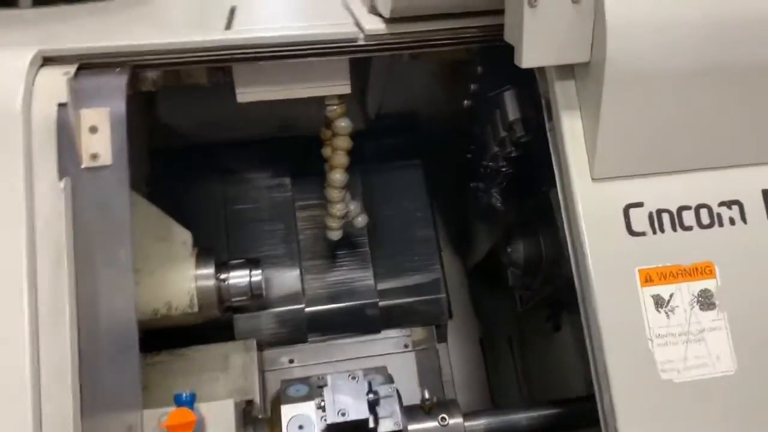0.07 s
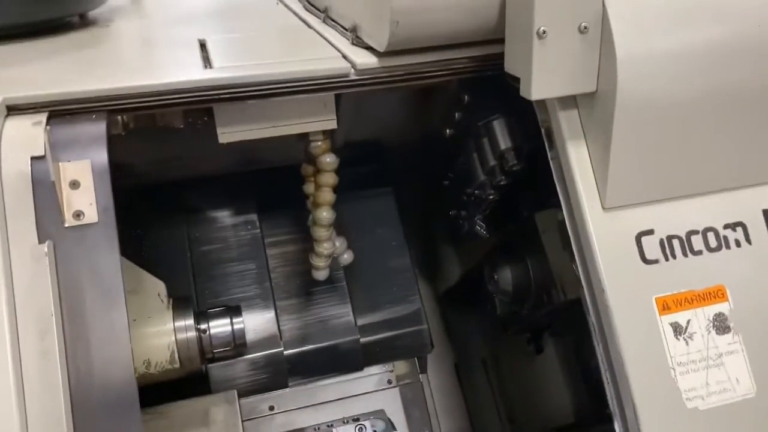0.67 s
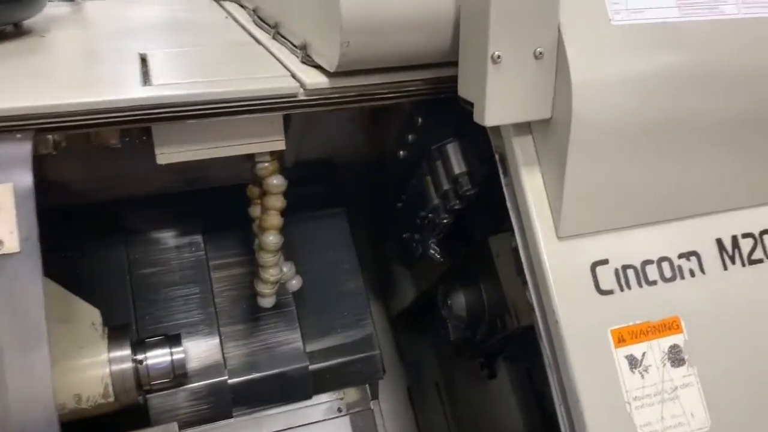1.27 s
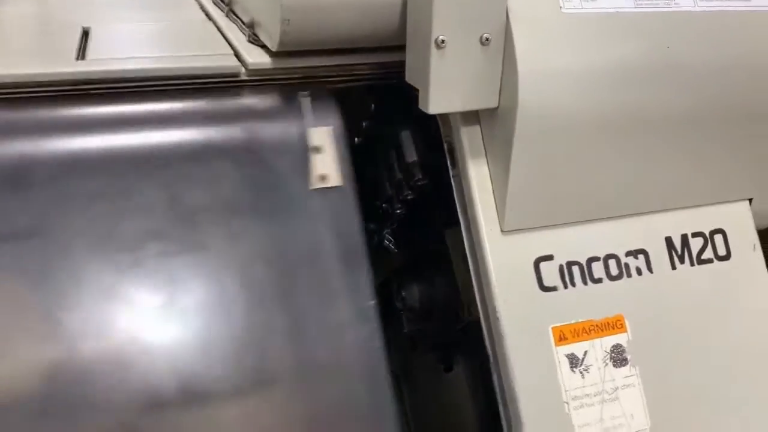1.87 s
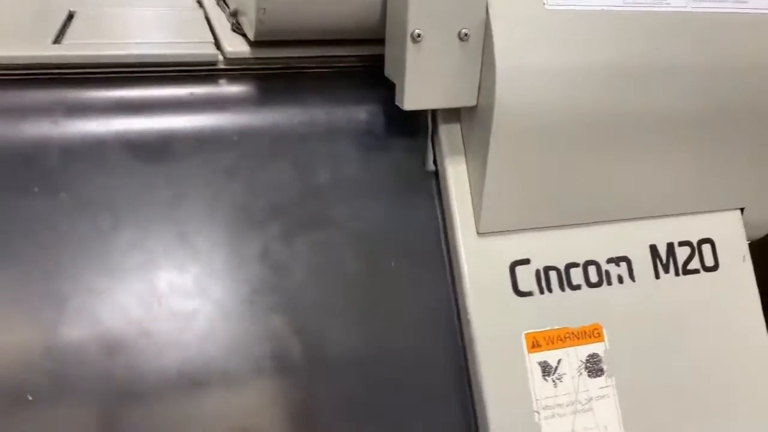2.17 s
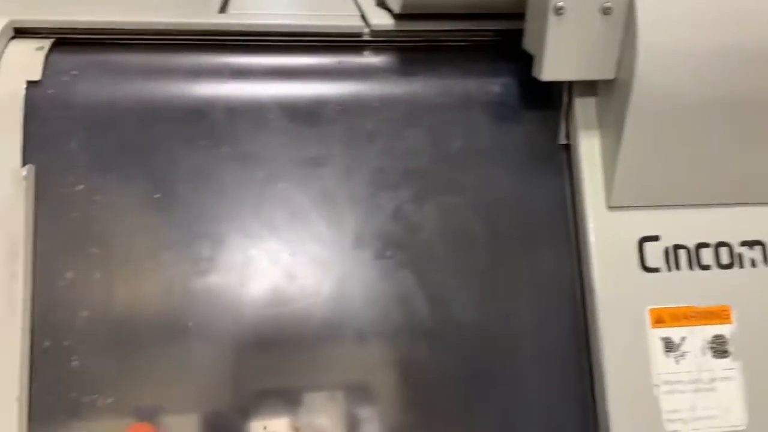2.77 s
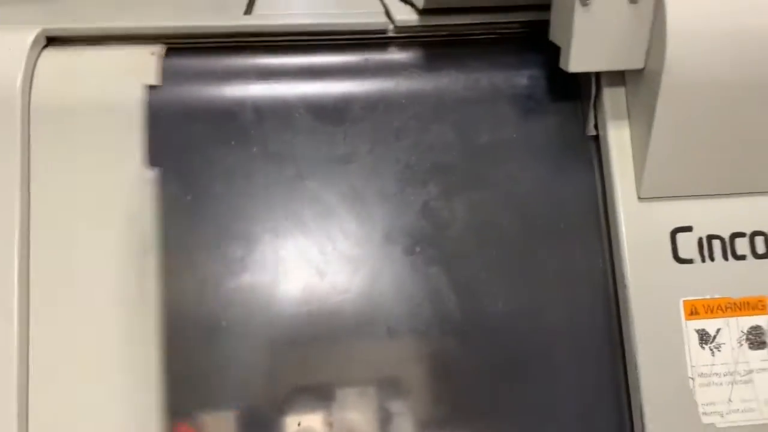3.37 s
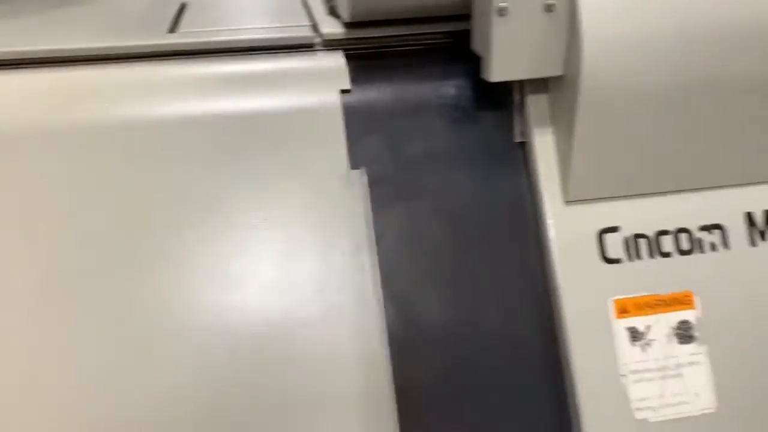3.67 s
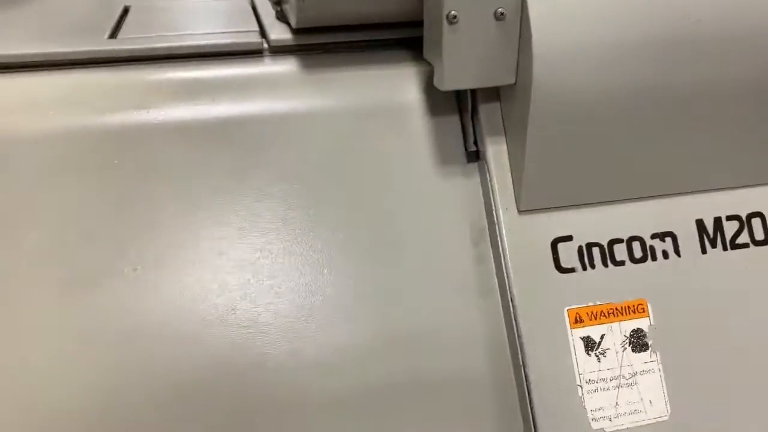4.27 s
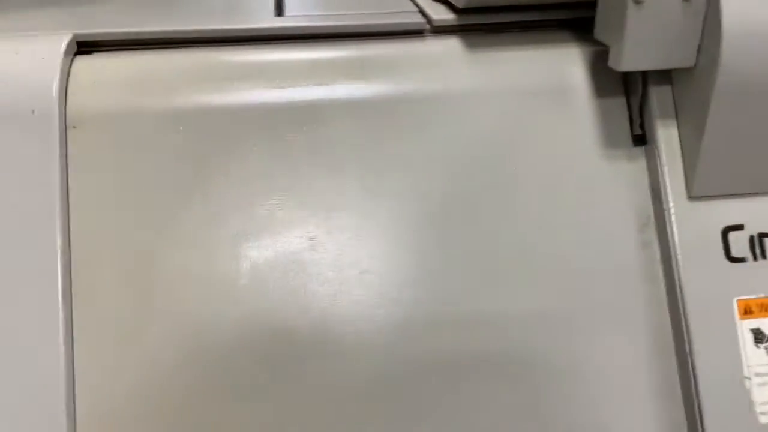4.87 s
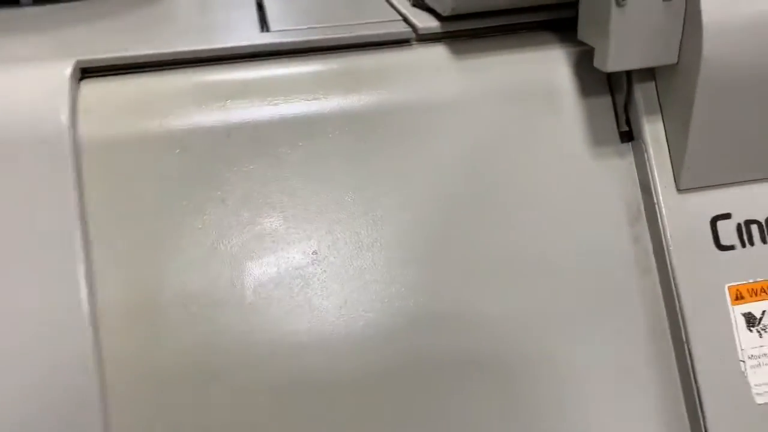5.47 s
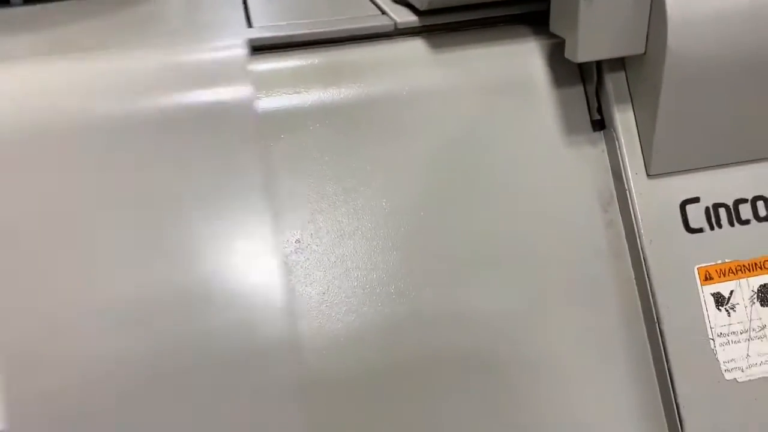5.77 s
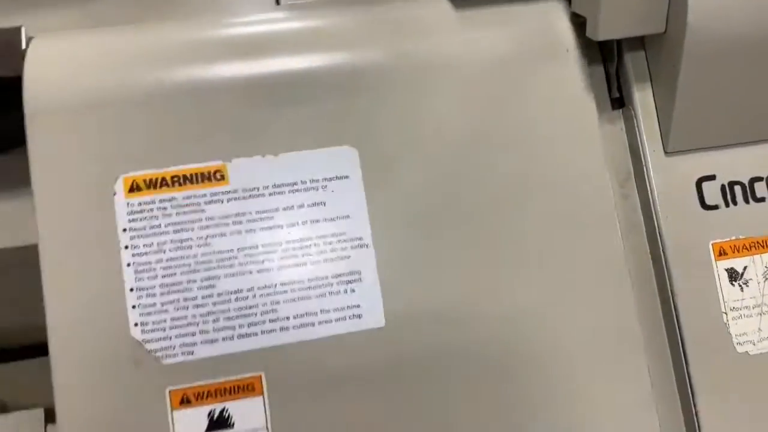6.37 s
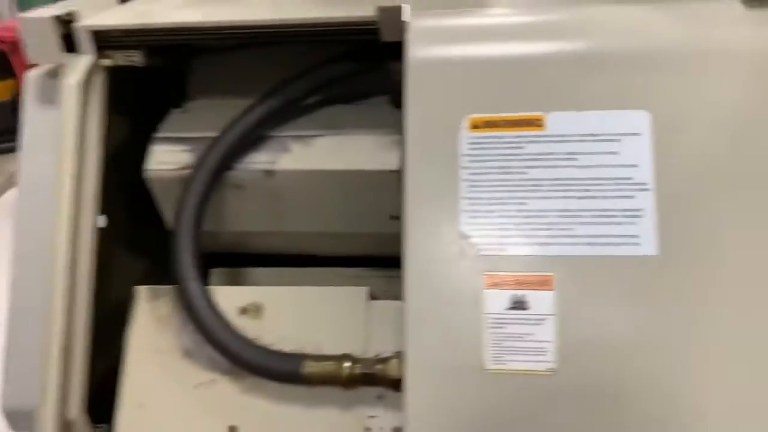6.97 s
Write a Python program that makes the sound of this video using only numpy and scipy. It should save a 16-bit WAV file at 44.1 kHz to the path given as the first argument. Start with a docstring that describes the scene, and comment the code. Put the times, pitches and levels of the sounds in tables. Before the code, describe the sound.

Fans and motors hum steadily in a workshop. After a few light knocks, a metal door on a lathe rolls along its rail and clunks shut, cutting off a faint machine whine. A second door slides with a hiss and closes sharply. Then a large cover jolts loose with a clatter and a brief screech, scrapes along and slams into its stop. The doors sound close, with slight dull reverberation.

```python
"""Three sheet-metal doors of a lathe are pushed shut one after another in a humming workshop.
A window door and a guard door roll along their rails and clunk against the frame; then a large cover
jolts into motion, scrapes along and slams into its stop. Each door is a plate whose modes are driven
by bumps in the rail or by a blow, while friction adds hiss and chatter. Fans and motors sound
throughout, and the hall gives the doors a dull reverberation."""
import sys
import numpy as np
from scipy import signal
from scipy.fft import rfft, irfft, next_fast_len
from scipy.io import wavfile

SR = 44100
rng = np.random.default_rng(int(sys.argv[2]) if len(sys.argv) > 2 else 0)


def file_out(sig):
    """Save sig as 16-bit WAV at sys.argv[1]."""
    # one column per channel
    cols = np.atleast_2d(sig).T
    # limit, then scale
    lim = np.clip(cols, -1, 1)
    pcm = np.round(lim * 32767).astype(np.int16)
    wavfile.write(sys.argv[1], SR, pcm)


N = 313992
TIME = np.arange(N) / SR


def from_db(db):
    """Amplitude ratio of a level in decibels."""
    return 10 ** (np.asarray(db) / 20)


def rms_one(x):
    """Normalisation to unit power."""
    return x / np.sqrt(np.mean(x ** 2) + 1e-20)


def at_hz(points, hz):
    """Interpolation on a logarithmic frequency axis."""
    f, value = np.transpose(points)
    return np.interp(np.log(hz), np.log(f), value)


def decay(t, t60):
    """Exponential damping: the level falls 60 dB in t60 seconds."""
    return np.exp(-np.log(1000) * t / t60)


def drift(rate_hz):
    """Random fluctuation: low-passed noise of unit power."""
    pole = np.exp(-80 * np.pi * rate_hz / SR)
    slow = signal.lfilter([1], [1, -2 * pole, pole * pole], rng.standard_normal(N // 40 + 2002))[2000:]
    return np.interp(np.arange(N) / 40, np.arange(len(slow)), rms_one(slow))


def add(out, s, sound):
    """Superposition of a sound starting at s seconds."""
    start = round(s * SR)
    out[:, start:start + sound.shape[1]] += sound[:, :N - start]


def place(x, lag_ms, pan_db=0):
    """Interaural differences: the left ear lags by lag_ms and is louder by pan_db."""
    length = x.shape[1]
    size = 2 * next_fast_len(length)
    delay = np.exp(-2j * np.pi * np.fft.rfftfreq(size, 1 / SR) * lag_ms / 1000)
    left = irfft(rfft(x[0], size) * delay)[:length]
    return np.array([left * from_db(pan_db / 2), x[1] * from_db(-pan_db / 2)])


EDGES_HZ = np.geomspace(25, 17000, 33)
BANK = [signal.butter(2, band, "band", fs=SR, output="sos") for band in zip(EDGES_HZ, EDGES_HZ[1:])]
def noise(spectrum, width, t, envelope=lambda hz: 1):
    """Band synthesis: stereo noise of about unit power, then an envelope on each band."""
    centres = np.sqrt(EDGES_HZ[1:] * EDGES_HZ[:-1])
    gains = from_db(at_hz(spectrum, centres))
    gains = gains / np.sqrt(np.sum(gains ** 2 * np.diff(EDGES_HZ)) / (SR / 2))
    white, out = rng.standard_normal((2, 2, len(t) + SR // 10)), 0
    for k, hz in enumerate(centres):
        mid, side = signal.sosfilt(BANK[k], white[k % 2])[:, -len(t):]
        spread = from_db(at_hz(width, hz))
        stereo = np.array([mid + spread * side, mid - spread * side]) / np.hypot(1, spread)
        out = out + gains[k] * envelope(hz) * stereo
    return out


# Fan noise. Each row: frequency in Hz, relative spectral density in dB.
FAN_SPECTRUM = [(22, -32), (58, -7), (80, -13.5), (100, -20.5), (125, -9.5), (175, -10.5), (250, -7),
                (310, -11.5), (390, -11.5), (470, -21.5), (700, -17.5), (930, -25), (1150, -23),
                (1600, -26.5), (3400, -32), (4800, -32.5), (5800, -38), (8300, -40.5), (11500, -46),
                (16000, -49.5)]
# Its stereo width. Each row: frequency in Hz, side over mid in dB.
FAN_WIDTH = [(60, -23), (150, -9.5), (380, -7), (950, -3), (2380, 1), (5980, -0.5), (15000, 0)]
# Tones of motors and fans. Each row: frequency in Hz, rms level in dB, line width in Hz.
HUM_LINES = [(61.7, -52, 2.8), (71.7, -52.5, 1.5), (120.3, -50, 1.3), (142.4, -57, 2.1), (175, -52, 2.2),
             (184.4, -47, 1.35), (191, -38, 1.06), (251.8, -45, 6.4), (282, -51, 3.3), (343.4, -49.5, 1.7),
             (357, -44, 1.86), (381, -49, 2.2), (413.5, -53.5, 3.1), (770, -54, 1.3), (1164, -51.5, 3.5),
             (1146, -53, 2.9)]
def workshop(fan_db=-32.5, flutter_db=1.95, hum_lag_ms=0.19, waver=0.32):
    """Fans radiate broadband noise; amplitude and phase modulation broaden the motors' spectral lines."""
    fans = noise(FAN_SPECTRUM, FAN_WIDTH, TIME, lambda hz: from_db(flutter_db * drift(8.2)))
    hum = 0
    for hz, db, width in HUM_LINES:
        amplitude = from_db(db) * np.sqrt(2) * (1 + waver * drift(2 * width))
        hum = hum + amplitude * np.sin(2 * np.pi * hz * TIME + drift(width))
    return from_db(fan_db) * fans + place(np.array([hum, hum]), hum_lag_ms)


# Stereo width of the lathe and its doors. Each row: frequency in Hz, side over mid in dB.
LATHE_WIDTH = [(100, -20), (400, -13), (1000, -5.5), (2500, 0.5), (8000, -3)]
# Noise of the machining chamber. Each row: frequency in Hz, relative spectral density in dB.
CHAMBER_SPECTRUM = [(200, -32), (400, -20), (520, 8), (700, -6.5), (900, -11), (1400, -11), (2000, -11),
                    (5000, -38)]
# What escapes through the opening. Each row: time in seconds, level in dB.
CHAMBER_ESCAPE = [(0, -43), (.7, -40), (1.4, -41), (2.25, -67)]
def chamber(lag_ms=-0.32):
    """Radiation through an aperture: the running machine fades as the window door closes."""
    s, db = np.transpose(CHAMBER_ESCAPE)
    out, t = np.zeros((2, N)), TIME[TIME < s[-1]]
    escaping = from_db(np.interp(t, s, db)) * noise(CHAMBER_SPECTRUM, LATHE_WIDTH, t)
    add(out, 0, place(escaping, lag_ms))
    return out


def panel(body, t60, damping=0.13, build_cycles=0.13):
    """Modal overlap: crowded plate modes merge into noise, the low ones slower to build and to die."""
    t = TIME[:int(SR * min(.1 + 2 * t60, .75))]
    def envelope(hz):
        return (1 - np.exp(-t * hz / build_cycles)) * decay(t, t60 * (hz / 1000) ** -damping)
    return noise(body, LATHE_WIDTH, t, envelope)


# Loose runners and catches. Each row: start in seconds, level in dB, centre in Hz,
# half-width in octaves, t60 at 1 kHz in seconds.
KNOCKS = [(1.095, -24, 1130, 0.21, 0.1), (1.396, -22, 1070, 0.58, 0.15), (1.414, -27.5, 4540, 0.96, 0.071),
          (1.422, -20, 343, 0.29, 0.096), (1.535, -37, 5770, 0.56, 0.24), (2.185, -27, 3100, 0.85, 0.057),
          (4.723, -42.5, 3980, 1, 0.58), (5.574, -27.5, 600, 0.51, 0.14)]
def knocks():
    """Band-limited excitation: a light contact wakes only one region of a panel's modes."""
    out = np.zeros((2, N))
    for s, db, hz, octaves, t60 in KNOCKS:
        hump = [(f, -20 * np.log10(1 + (np.log2(f / hz) / octaves) ** 2)) for f in EDGES_HZ]
        add(out, s, from_db(db) * panel(hump, t60))
    return out


# Prominent modes of each door. Each row: frequency in Hz, t60 in seconds,
# relative level in dB when struck at the edge, the same when shaken from the rail.
WINDOW_MODES = [(146, 0.56, -10, -22), (204, 0.26, -3.5, -5), (273, 0.11, -13, -16), (324, 0.15, 0, -11),
                (372, 0.18, -8, -4), (474, 0.13, -3, -27), (657, 0.098, -17, -0.5), (720, 0.1, 1.5, -15),
                (792, 0.085, -5, -18), (968, .17, -22, -10), (1022, 0.12, -12, -4), (1074, 0.13, -19, -7.5),
                (1463, 0.15, -11, -11.5), (1610, 0.12, -14, -14), (2000, 0.082, -10.5, -9.5),
                (2250, 0.18, -22, -9), (2990, 0.23, -33, -16), (3500, .25, -32, -19)]
GUARD_MODES = [(142.7, 1.3, -17, -26), (202, 0.12, 3, -14), (289, 0.39, -13, -19), (355.4, 0.41, -14, 6),
               (527, 0.36, -17, -11), (662, 0.13, -3.5, -7), (819, 0.2, -13, -8), (1222, 0.064, -5, -6),
               (1340, 0.26, -23, -11), (1960, 0.15, -15, -8), (2094, 0.22, -21, -18),
               (2460, 0.17, -12.5, -15), (3020, 0.27, -23, -20), (3400, 0.21, -21, -14)]
COVER_MODES = [(193, 0.35, -26, 0.5), (260.6, 1.6, -16, -10.5), (323, 0.56, -3, -32), (343, 0.4, -6, -20),
               (366, 0.53, -9, -21), (380, 1.17, -7.5, -13), (491, 0.58, -11.5, -18), (507, 0.5, -16.5, -7),
               (589, 0.54, -25, -12.5), (667, 0.47, -15, -15), (750, 0.85, -24, -16), (777, 0.69, -14, -26),
               (850, 1.1, -21, -29), (886, 0.43, -34, -10), (990, 1.4, -27.5, -38), (1106, .3, -30, -7),
               (1137, 0.32, -9, -9), (1276, 0.3, -26, -6), (1530, 0.68, -30, -44), (1620, 1, -30, -40),
               (1675, 0.6, -20, -31), (1890, 0.47, -17, -25), (1940, 0.48, -19, -30),
               (2310, 0.43, -18, -29), (2610, 0.45, -20, -34), (2869, .7, -32, -38), (3230, .4, -26, -33),
               (4290, 0.43, -23, -21)]
def ringing(modes, where, scatter_db=1.0, ear_phase=0.12):
    """Modal superposition: damped sinusoids, weighted by the point of contact and a little by chance."""
    t, out = TIME[:SR * 5 // 4], 0
    for k, (hz, t60, edge_db, rail_db) in enumerate(modes):
        db = (edge_db if where == "edge" else rail_db) + scatter_db * rng.standard_normal()
        phase = k * np.pi + ear_phase * rng.standard_normal((2, 1))
        envelope = decay(t, t60) * (1 - np.exp(-t * hz))
        out = out + from_db(db) * np.sin(2 * np.pi * hz * t + phase) * envelope
    return out


# Spectra of rolling and of rubbing. Each row: frequency in Hz, relative spectral density in dB.
WINDOW_ROLL = [(80, -7), (200, -1), (380, 0), (500, -11), (680, -4), (850, -2.5), (1050, -1.5), (1500, -4),
               (2000, -6), (3000, -7), (4500, -18.5), (8000, -39)]
GUARD_ROLL = [(120, -20), (350, -10), (750, 2.5), (1200, -2.5), (2000, -4), (3500, -6), (6000, -14),
              (9000, -17)]
COVER_ROLL = [(100, 2), (270, -4), (380, 17), (520, -2), (750, -0.5), (1200, -4.5), (1600, -6.5),
              (2200, -0.5), (3200, -9.5), (4500, -12.5), (8000, -29)]
RUB_SPECTRUM = [(2500, -23), (4500, 5.5), (6000, -4), (8000, 7.5), (10000, -21), (12000, 3), (15500, -18)]
# Doors on their rails. Each entry: rolling spectrum, modes, modes over rolling in dB,
# exponent of speed that the hiss follows, left-ear delay in ms.
RAILS = {"window": (WINDOW_ROLL, WINDOW_MODES, -2.1, 0.65, -0.15),
         "guard": (GUARD_ROLL, GUARD_MODES, -7.5, 1.53, 0.15),
         "cover": (COVER_ROLL, COVER_MODES, -10, 1.94, -0.045)}
# Shoves by hand. Each row: start and end in seconds, door, run-up in seconds,
# later change of speed in dB per second, rolling and hiss levels in dB at the end of the run-up.
PUSHES = [(1.47, 2.253, "window", 0.22, -32.5, -24.5, -46),
          (3.289, 4.165, "guard", 0.32, -17.5, -33.5, -37), (3.998, 4.166, "guard", 0.034, -2, -37, -58),
          (5.31, 5.533, "cover", 0.11, -87, -35, -51), (5.544, 6.33, "cover", 0.046, 7, -29.5, -47.5)]
def slide(push, bumps_per_s=2000, grain_db=2.5, ring_t60=.14, judder_db=2.0, stretches=8):
    """Roughness excitation: rail bumps shake the panel and friction hisses; both grow with speed."""
    start, end, door, run_up, db_per_s, roll_db, hiss_db = push
    spectrum, modes, modes_db, hiss_exponent, lag_ms = RAILS[door]
    out, t = np.zeros((2, N)), TIME[TIME < end - start]
    swell = np.sin(np.pi / 2 * np.clip(t / run_up, 1e-3, 1))
    speed_db = 20 * np.log10(swell) + db_per_s * np.maximum(t - run_up, 0)
    sizes = from_db(grain_db * np.minimum(rng.exponential(1, len(t)), 4)) * rng.choice([-1, 1], len(t))
    bumps = rms_one(sizes * (rng.random(len(t)) < bumps_per_s / SR)) * from_db(roll_db + speed_db)
    # Each stretch of rail wakes other modes, so the responses crossfade as the door travels.
    def crossfades(count):
        return [np.sqrt(np.maximum(1 - abs((count - 1) * t / t[-1] - k), 0)) for k in range(count)]
    paths = [(share, panel(spectrum, ring_t60)) for share in crossfades(stretches)]
    for share in crossfades(3):
        paths.append((from_db(modes_db) * share, ringing(modes, "rail", scatter_db=3.5)))
    for share, response in paths:
        unit_response = response / np.linalg.norm(response[0])
        add(out, start, signal.fftconvolve([share * bumps], unit_response, axes=1))
    friction_db = hiss_exponent * speed_db + judder_db * drift(52)[:len(t)]
    add(out, start, from_db(hiss_db + friction_db) * noise(RUB_SPECTRUM, LATHE_WIDTH, t))
    return place(out, lag_ms)


# Binding runners. Each row: time of the peak in seconds, rms level in dB, centre in Hz,
# length in seconds, Q of the first filter (low for a broad scrape, high for a thin chirp).
CHATTER = [(1.637, -43, 3500, 0.09, 3), (3.389, -45.5, 4360, 0.067, 12), (3.419, -40.5, 780, 0.16, 6),
           (3.58, -44.5, 3500, 0.12, 2), (3.895, -44, 1700, 0.08, 9), (5.646, -34.5, 980, 0.085, 3.7),
           (6.1, -42, 1850, 0.36, 18), (6.18, -46, 3370, 0.28, 2.2), (6.209, -39.5, 2180, 0.17, 20)]
def chatter(width=0.49):
    """Friction-driven resonance: a binding runner shudders briefly in one band."""
    out = np.zeros((2, N))
    for s, db, hz, length, q in CHATTER:
        size = int(length * SR)
        mid, side = signal.lfilter(*signal.iirpeak(hz, q, fs=SR), rng.standard_normal((2, size)))
        stereo = [mid + width * side, mid - width * side]
        shudder = signal.lfilter(*signal.iirpeak(hz, max(q / 2, 1), fs=SR), stereo)
        add(out, s - length / 2, from_db(db) * rms_one(shudder * np.hanning(size)))
    return out


def overtones(body, t60, level_db=-13.5, t60_ratio=1.32, count=240):
    """High-order modes of a steel sheet: damped complex sinusoids, and their phases at the two ears."""
    t = TIME[:int(SR * min(.1 + 1.2 * t60, .75))]
    spot, life, ear = rng.random((3, count, 1))
    hz = 1000 + 11000 * (np.arange(count)[:, None] + spot) / count
    mode_t60 = t60_ratio * t60 * (.5 + life) * (hz / 1000) ** -.25
    partials = np.exp(2j * np.pi * hz * t) * decay(t, mode_t60)
    ear_phasors = np.exp(1j * np.pi * np.array([[1], [-1]]) * (ear.T - .5))
    return from_db(level_db + at_hz(body, hz)) * partials, ear_phasors


# Spectra of the struck panels (jolt and stop are the cover's) and of the steel contact.
# Each row: frequency in Hz, relative spectral density in dB.
WINDOW_BODY = [(25, -9), (55, 7), (100, -12), (180, 5.5), (330, 2), (560, -9), (740, -3.5), (1150, -15.5),
               (1800, -13.5), (3200, -18), (8000, -23), (12000, -29), (16000, -41)]
GUARD_BODY = [(25, -23), (58, -1), (120, -8), (210, -4), (300, -9), (450, -7), (680, -9), (1050, -17.5),
              (2200, -17.5), (3500, -22.5), (5500, -29), (8300, -34), (16000, -36)]
JOLT_BODY = [(25, -17), (65, 0), (100, 0.5), (180, 2.5), (320, -6), (520, 2.5), (700, -9.5), (1200, -3.5),
             (1600, -15), (2300, -12.5), (4500, -16), (8000, -25), (16000, -39)]
STOP_BODY = [(25, -23), (58, -7), (130, -13.5), (230, -5.5), (350, 1), (560, -7.5), (780, -5), (1300, -14),
             (2400, -14), (5500, -26.5), (8000, -27.5), (12000, -40), (16000, -39)]
CRACK_SPECTRUM = [(1000, -12), (2000, -17), (5500, -7), (8300, 4), (9800, -28), (11500, 12.5), (15500, -16)]
# Kinds of impact. Each entry: body spectrum, modes, point of contact, body t60 at 1 kHz in seconds,
# left-ear delay in ms, left over right in dB.
IMPACTS = {"window": (WINDOW_BODY, WINDOW_MODES, "edge", 0.18, 0.022, .5),
           "guard": (GUARD_BODY, GUARD_MODES, "edge", 0.21, 0.015, 0),
           "jolt": (JOLT_BODY, COVER_MODES, "rail", 0.372, -0.13, 0.88),
           "stop": (STOP_BODY, COVER_MODES, "edge", 0.44, 0.033, -0.23)}
# Blows. Each row: start in seconds, kind, levels of body, modes and crack in dB,
# number of contacts, their spacing in seconds, loss per rebound in dB.
BLOWS = [(2.2536, "window", -9.5, -9.5, -24, 2, 0.012, 4), (2.2832, "window", -11, -17.5, -24, 1, 0.012, 6),
         (4.1632, "guard", -12.5, -12.5, -12, 2, 0.022, 17), (4.213, "guard", -29, -32, -44, 1, 0.015, 17),
         (5.7050, "jolt", -10.5, -10, -31, 2, 0.027, 2.5), (5.7140, "jolt", -17.5, -26, -18, 1, .02, 3),
         (5.7540, "jolt", -11.5, -15, -18, 5, 0.026, 4), (6.3290, "stop", -6, -16, -17, 2, 0.011, 14),
         (6.3520, "stop", -16, -5.5, -17.5, 3, 0.016, 0.9)]
def clunks(crack_t60=0.04, crack_rise_s=0.00029, rebound_modes_db=-9.5, rebound_crack_db=-1.5):
    """Impulse response: steel cracks on steel, the panel booms and rings, and weaker rebounds follow."""
    out, t = np.zeros((2, N)), TIME[:SR // 10]
    sheets = {kind: overtones(body, t60) for kind, (body, _, _, t60, _, _) in IMPACTS.items()}
    crack_envelope = decay(t, crack_t60) * (1 - np.exp(-t / crack_rise_s))
    for s, kind, body_db, modes_db, crack_db, contacts, gap, loss_db in BLOWS:
        body, modes, where, t60, lag_ms, pan_db = IMPACTS[kind]
        partials, ear_phasors = sheets[kind]
        for k in range(round(contacts)):
            crack = noise(CRACK_SPECTRUM, LATHE_WIDTH, t) * crack_envelope
            shimmer = ((ear_phasors * rng.standard_normal(len(partials))) @ partials).imag
            # A rebound is a softer contact, so crack and modes lose more than the body does.
            parts = [(crack_db + k * rebound_crack_db, crack),
                     (body_db, panel(body, t60)),
                     (body_db, shimmer),
                     (modes_db + k * rebound_modes_db, ringing(modes, where))]
            for db, part in parts:
                add(out, s + k * gap, from_db(db - k * loss_db) * place(part, lag_ms, pan_db))
    return out


# A door's weight lands on the frame just after the first touch.
# Each row: start in seconds, peak level in dB, frequency in Hz, rise time in seconds.
THUDS = [(2.2555, -10.5, 606, 0.002), (2.265, -5.5, 253, 0.0028), (2.272, -11, 166.4, 0.0088),
         (2.2836, -15, 252, 0.0026), (4.1660, -3.5, 243, 0.0019)]
def thuds():
    """Heavily damped flexure: the whole panel bends for a few cycles."""
    out, t = np.zeros((2, N)), TIME[:SR // 10]
    for s, db, hz, rise in THUDS:
        flex = from_db(db) * t / rise * np.exp(1 - t / rise) * np.sin(2 * np.pi * hz * t)
        add(out, s, np.array([flex, flex]))
    return out


# Grinding of the cover's runner. Each row: time in seconds, centre in Hz, level in dB.
SCREECH_GLIDE = [(5.704, 1291, -15), (5.735, 1110, -18), (5.8, 1020, -22.5), (5.83, 779, -24.5),
                 (5.885, 703, -22), (5.92, 700, -45)]
def screech(half_width_hz=105, lag_ms=-0.089):
    """Narrowband friction noise: a rough ring sinks in pitch as the cover's runner tears loose."""
    s, hz, db = np.transpose(SCREECH_GLIDE)
    out, t = np.zeros((2, N)), s[0] + TIME[TIME < s[-1] - s[0]]
    lowpass = signal.butter(2, half_width_hz, fs=SR, output="sos")
    rough = signal.sosfilt(lowpass, rng.standard_normal((2, SR)))[:, -len(t):]
    phase = 2 * np.pi * np.cumsum(np.interp(t, s, hz)) / SR
    ring = from_db(np.interp(t, s, db)) * rms_one(rough[0] * np.cos(phase) + rough[1] * np.sin(phase))
    add(out, s[0], place(np.array([ring, ring]), lag_ms))
    return out


def room(x, t60=0.97, gain_db=-21.5, wall_cut_hz=3500, onset_s=0.0085):
    """Diffuse reverberation: convolution with a dull, exponentially decaying noise tail."""
    t = TIME[:SR]
    tail = rng.standard_normal((2, SR)) * decay(t, t60) * (1 - np.exp(-t / onset_s))
    walls = signal.butter(1, wall_cut_hz, fs=SR, output="sos")
    tail = signal.sosfilt(walls, tail / np.linalg.norm(tail[0]))
    return from_db(gain_db) * signal.fftconvolve(x, tail, axes=1)[:, :N]


def scene():
    """Superposition of the three doors, their reverberation and the running machines."""
    doors = clunks() + thuds() + knocks() + chatter() + screech() + sum(slide(push) for push in PUSHES)
    return doors + room(doors) + workshop() + chamber()


def record(dry, port_hz=7800, port_q=4, ceiling=0.71, cutoff_hz=16000):
    """Resonance of the microphone port, then soft saturation of the peaks and a steep low-pass."""
    heard = dry + .5 * signal.lfilter(*signal.iirpeak(port_hz, port_q, fs=SR), dry)
    lowpass = signal.ellip(10, .1, 80, cutoff_hz, fs=SR, output="sos")
    return signal.sosfilt(lowpass, ceiling * np.tanh(heard / ceiling))


dry = scene()
out = record(dry)
file_out(out)
```